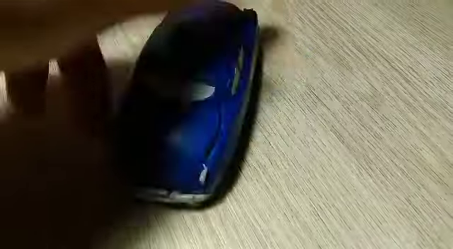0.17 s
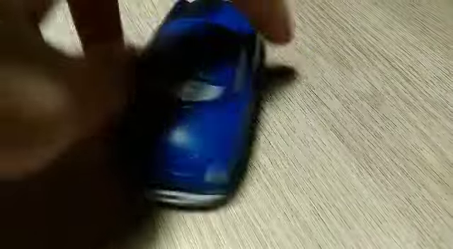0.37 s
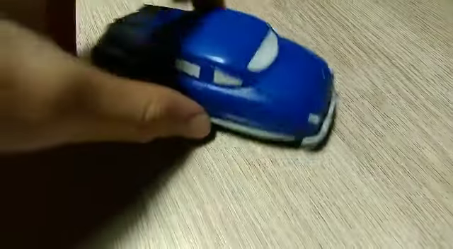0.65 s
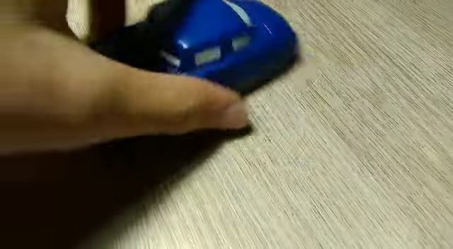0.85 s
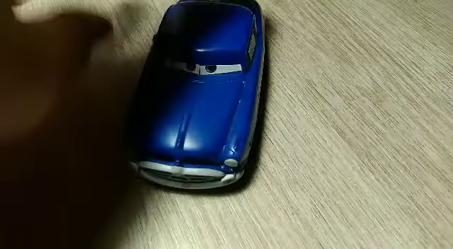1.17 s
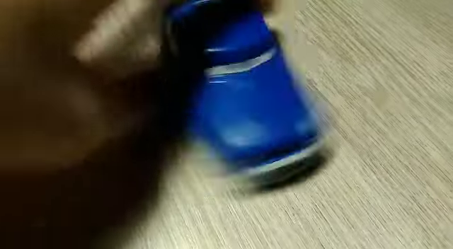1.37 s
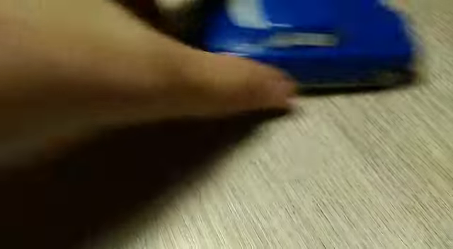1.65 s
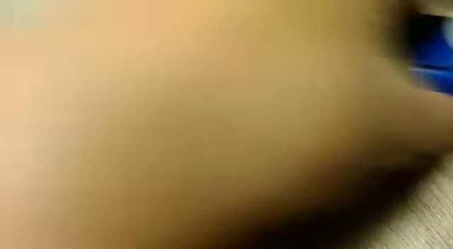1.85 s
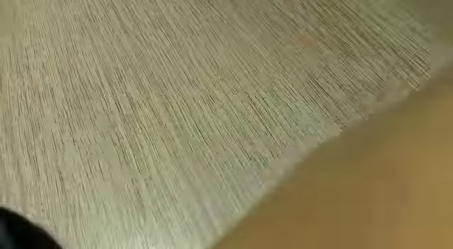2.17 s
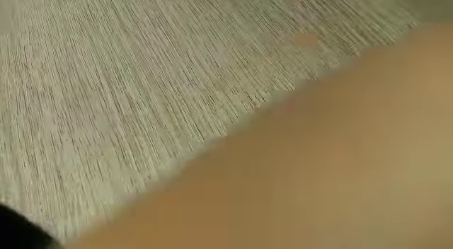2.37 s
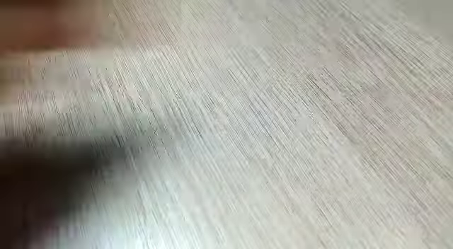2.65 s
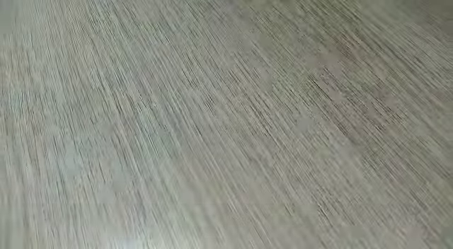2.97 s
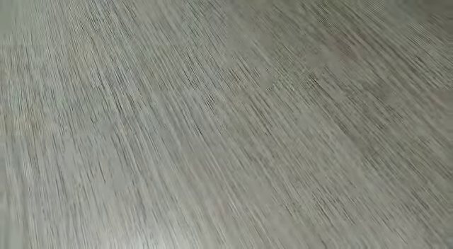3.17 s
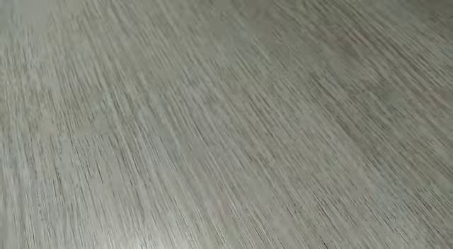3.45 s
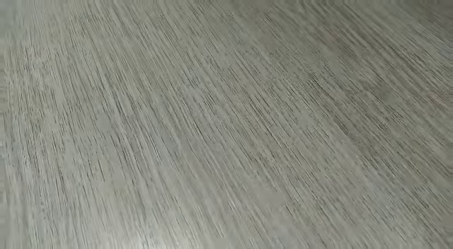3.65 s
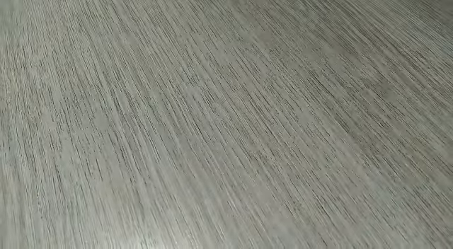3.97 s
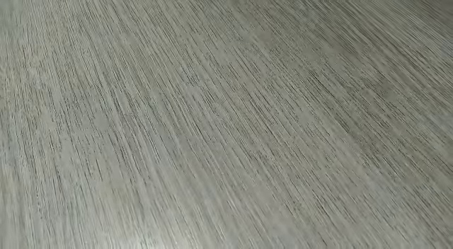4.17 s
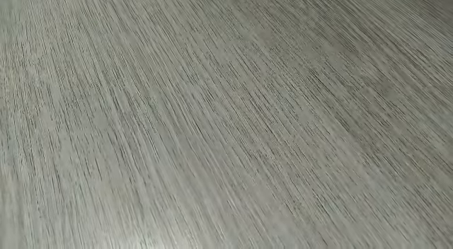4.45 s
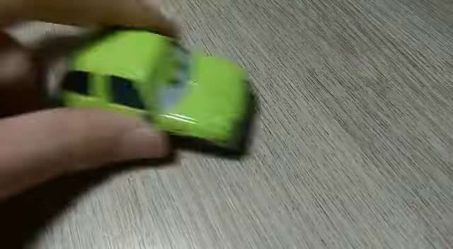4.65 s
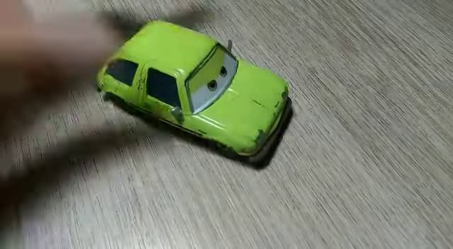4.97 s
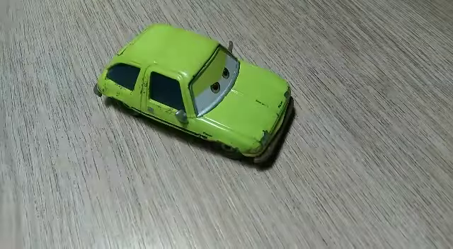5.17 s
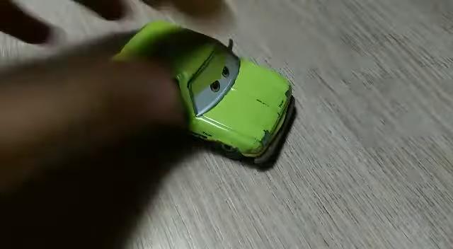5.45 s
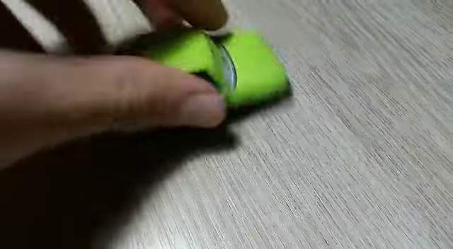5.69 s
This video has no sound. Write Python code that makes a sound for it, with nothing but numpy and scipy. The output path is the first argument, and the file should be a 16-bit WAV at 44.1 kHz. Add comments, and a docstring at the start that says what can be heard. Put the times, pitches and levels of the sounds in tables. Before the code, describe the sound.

Heard very close in a small, quiet, dry room: bursts of metallic wheel chatter and scraping on a hard tabletop, then a louder free run ending in bright clacks and low thumps. Skin slides dully over the surface. A quieter, grainy roll approaches in surges with loose axle clicks, stops with one crisp knock, pauses, then a brief scrapy push with a gritty skid.

```python
"""A laminate table in a small, quiet room: a hand steers a die-cast toy car to and fro, then lets it run off
and clack to a stop. A second car is rolled closer, set down and pushed on. Random small impacts stand for
the wheels chattering over the embossed grain; they ring the metal shells and make the tabletop drum.
Resonant bursts make knocks, clicks and bumps; filtered noise makes skin on laminate and the room's air."""
import sys
import numpy as np
from scipy import signal
from scipy.fft import rfft, irfft
from scipy.io import wavfile
from scipy.ndimage import uniform_filter1d, map_coordinates

SR = 44100
rng = np.random.default_rng(int(sys.argv[2]) if len(sys.argv) > 2 else 0)


def unload_audio(sound):
    """Save the sound as a 16-bit wav file, at the path given as the first command line argument."""
    columns = np.transpose(np.atleast_2d(sound))
    # keep every value between -1 and 1, then stretch to whole-number steps
    steps = np.round(np.clip(columns, -1, 1) * 32767)
    wavfile.write(sys.argv[1], SR, steps.astype(np.int16))


N = 256662
TIME = np.arange(N) / SR   # s
RELEASE_DB_PER_S = 268.5   # a stroke dies away at this rate when the hand stops
CRUISE_DB = -37.5   # shell rattle at an ordinary pace


def amp(db):
    """Decibels to gain."""
    return 10 ** (np.asarray(db) / 20)


def rms_one(x):
    """Scale to unit power."""
    return x / np.sqrt(np.mean(x ** 2) + 1e-20)


def steady(x, window_s):
    """Unit power over every short stretch, with the fine grain kept."""
    power = uniform_filter1d(x * x, round(window_s * SR), mode="reflect").clip(0)
    return x / np.sqrt(power + 1e-12)


def drift(rate):
    """Smooth chance of spread 1 that turns about rate times a second."""
    knots = rng.standard_normal(N // 40)
    return rms_one(np.interp(TIME * rate, np.arange(len(knots)), knots))


def colour(x, points):
    """Causal (minimum-phase) filter that follows a spectrum and falls away beyond its ends."""
    size = 8192
    hz, db = np.transpose(points)
    octave = np.log2(np.maximum(np.arange(size // 2 + 1) * SR / size, 1))
    beyond = np.abs(octave - np.clip(octave, np.log2(hz[0]), np.log2(hz[-1])))
    gain_db = np.interp(octave, np.log2(hz), db) - 20 * beyond
    # folding the cepstrum to positive times gives minimum phase
    cepstrum = irfft(np.log(amp(gain_db)))
    cepstrum[1:size // 2] *= 2
    cepstrum[size // 2 + 1:] = 0
    response = irfft(np.exp(rfft(cepstrum)))
    return signal.fftconvolve(x, response)[:len(x)]


def resonate(x, hz, width_hz):
    """A two-pole resonance with gain 1 on top; the narrower, the longer it rings."""
    r = np.exp(-np.pi * width_hz / SR)
    feed = np.array([1, 0, -1]) * (1 - r * r) / 2
    return signal.lfilter(feed, [1, -2 * r * np.cos(2 * np.pi * hz / SR), r * r], x)


def cut(x, hz, kind):
    """Steep low- or high-pass."""
    return signal.sosfilt(signal.butter(4, hz, kind, fs=SR, output="sos"), x)


def add(track, s, sound):
    """Mix a sound in at time s."""
    start = round(s * SR)
    track[start:start + len(sound)] += sound[:N - start]


def stroke(s, run_up_s, length_s, db, fade_db_per_s=RELEASE_DB_PER_S):
    """Gain of one movement: it gathers pace, holds, and dies away."""
    age = TIME - s
    run_up = np.clip(age / max(run_up_s, 1e-3), 0, 1)
    return run_up * amp(db - fade_db_per_s * np.maximum(age - length_s, 0))


def strokes(rows, fade_db_per_s=RELEASE_DB_PER_S):
    """Each movement takes over from the one before as that fades."""
    return np.max([stroke(*row, fade_db_per_s) for row in rows], axis=0)


# spectrum of the room's air: pitch_hz, level_db
AIR_COLOUR = [(15, -43.5), (25, -25.5), (59, -6.5), (112, -9), (130, -5), (393, -17), (462, -15),
              (834, -38), (1800, -55), (2340, -92), (3960, -120)]
# partials of a faint electronic whine: pitch_hz, level_db (before its swells)
WHINE_PARTIALS = [(3483, -106), (6950, -100), (10411, -93.5), (13900, -101.5)]
# swells of that whine: start_s, run_up_s, length_s, gain_db
WHINE_SWELLS = [(2.62, 0.046, 0.54, 4.5), (4.85, 0.035, 0.65, 11.5)]


def background(air_db, hiss_db):
    """Low room noise, a trace of hiss and a thin, wavering electronic whine that comes and goes."""
    whine = sum(amp(db + 3 * drift(39)) * np.sqrt(2) * np.sin(2 * np.pi * hz * TIME)
                for hz, db in WHINE_PARTIALS)
    air = amp(air_db) * rms_one(colour(rng.standard_normal(N), AIR_COLOUR))
    hiss = amp(hiss_db) * cut(rng.standard_normal(N), 7400, "low")
    return air + hiss + whine * strokes(WHINE_SWELLS)


def room(x, t60_s, wet_db, wall_hz):
    """Close walls return a short, slightly dull tail of decaying noise."""
    t = TIME[:SR // 2]
    tail = rng.standard_normal(len(t)) * amp(-60 * t / t60_s) * (t > .004)
    tail = signal.lfilter(*signal.butter(1, wall_hz, fs=SR), tail)
    return x + amp(wet_db) * signal.fftconvolve(x, tail / np.linalg.norm(tail))[:N]


# the arm slides over the table: start_s, run_up_s, length_s, level_db (relative)
ARM_SLIDES = [(2.5, 0.13, 0.097, -46.5), (2.61, 0.013, 0.04, -57), (2.66, 0.039, 0.48, -63)]
# the hand rubs it: start_s, run_up_s, length_s, level_db
PALM_RUBS = [(2.67, 0.04, 0.15, -67), (2.82, 0.03, 0.15, -62), (2.995, 0.012, 0.11, -57),
             (3.1, 0.02, 0.05, -47)]
# spectrum of the slide's rumble: pitch_hz, level_db
RUMBLE_COLOUR = [(24, -45), (40, 0.5), (97, 9), (140, 8), (208, 3), (308, -8), (400, -22), (520, -57),
                 (880, -120)]
# spectrum of skin rubbing: pitch_hz, level_db
RUB_COLOUR = [(150, -36), (250, -12.5), (400, -15), (530, -10.5), (650, -22.5), (1030, -28.5), (1370, -43),
              (1800, -48), (5000, -52), (7000, -45), (11000, -120)]


def arm(rumble_db, rub_db):
    """Skin slides dully over the laminate as uneven noise: the arm mostly rumbles, the hand only rubs."""
    slide = strokes(ARM_SLIDES)
    friction = rng.standard_normal(N) * amp(2.5 * drift(40))
    rub = amp(rub_db) * slide + strokes(PALM_RUBS)
    rumble = amp(rumble_db) * slide
    return rumble * rms_one(colour(friction, RUMBLE_COLOUR)) + rub * rms_one(colour(friction, RUB_COLOUR))


# bumps of hand and car on the tabletop: start_s, level_db (relative), pitch_hz, width_hz
TABLE_BUMPS = [(0.466, -25.5, 269, 202), (0.832, -28.5, 277, 200), (1.337, -27, 255, 296),
               (1.58, -25.5, 290, 685), (1.719, -21, 257, 100), (1.968, -24, 728, 506),
               (2.021, -21, 900, 604), (2.293, -24, 200.5, 400), (2.32, -19, 95, 90.5),
               (2.612, -18.5, 133, 68.5), (2.616, -23, 75.4, 49.7), (3.114, -28, 398, 250),
               (3.144, -30, 292, 200), (3.405, -24.5, 259, 245), (3.573, -23.5, 280, 148),
               (3.661, -30.5, 269, 120), (3.78, -27, 274, 120), (3.88, -25.5, 266, 120),
               (3.96, -25.5, 278, 120), (4.031, -29.5, 133, 80), (4.164, -28, 268, 100),
               (4.21, -27, 275, 100), (4.789, -19.5, 275, 110), (4.79, -26.5, 640, 400),
               (5.589, -28.5, 429, 247), (5.605, -28, 191, 150), (5.776, -21, 183, 120)]


def bumps(level_db, decay_s, scatter_db):
    """A blow sets one resonance of the tabletop booming briefly, and its neighbours with it."""
    out, t = np.zeros(N), TIME[:SR // 3]
    for s, db, hz, width_hz in TABLE_BUMPS:
        noise = resonate(rng.standard_normal(len(t)), hz, width_hz)
        neighbours = steady(cut(noise, 1000, "low"), .02)
        tone = np.sqrt(2) * np.sin(2 * np.pi * hz * t)
        boom = rms_one(tone + amp(scatter_db) * width_hz / hz * neighbours)
        envelope = (1 - np.exp(-2 * hz * t)) * np.exp(-t / decay_s)
        add(out, s, amp(db + level_db) * boom * envelope)
    return out


# drumming spectrum of the board: pitch_hz, level_db
BOARD_COLOUR = [(35, -46), (60, -5), (87, -2), (134, 3.5), (206, 1.5), (269, -2), (360, -11), (514, -7),
                (606, -9), (832, -10.5), (945, -9.5), (1250, -17.5), (1620, -46.5), (2750, -120)]
# resonances of the tabletop: pitch_hz, width_hz, level_db
BOARD_MODES = [(130, 50, -3), (270, 40, 0), (430, 80, -15), (522, 70, -11), (818, 90, -13)]


def tabletop(force):
    """The board drums evenly in a few broad resonances."""
    broad = rms_one(colour(force, BOARD_COLOUR))
    return steady(broad + amp(-3) * ring(force, BOARD_MODES, shift_db=1.5), .04)


def wheel_force(per_s, spread_db, judder_db, judder_rate):
    """Wheels hit ridges of the grain: tiny impacts of uneven size that judder in strength."""
    sizes = amp(spread_db * np.minimum(rng.exponential(1, N), 4)) * rng.choice([-1, 1], N)
    impacts = sizes * (rng.random(N) < per_s / SR)
    return impacts * amp(judder_db * drift(judder_rate)) + 1e-18


def stick_slip(per_s, slip_s, spread_db):
    """Gain of a wheel that catches and lets go at uneven intervals; unit power."""
    gaps, sizes = rng.standard_normal((2, N // 100))
    starts = np.append(0, np.cumsum(np.exp(.3 * gaps) / per_s))
    slip = np.searchsorted(starts, TIME, side="right") - 1
    age = (TIME - starts[slip]) / slip_s
    return rms_one(amp(spread_db * sizes[slip].clip(-1.5, 1.5)) * age * np.exp(-age))


def ring(force, modes, shift_db):
    """Resonances in parallel; grip and contact point keep shifting which of them speak."""
    rings = sum(resonate(force, hz, width) * amp(db + shift_db * drift(16).clip(-2, 2))
                for hz, width, db in modes)
    top_hz = 1.15 * max(hz for hz, width, db in modes)
    return rms_one(cut(cut(rings, top_hz, "low"), top_hz, "low"))


def regrip(x, per_s, detune):
    """Each change of finger pressure or contact point retunes the resonances a little."""
    grip = (TIME * per_s).astype(int)
    speed = detune * rng.standard_normal(N // 40)[grip]
    return map_coordinates(x, [np.arange(N) + np.cumsum(speed)], order=3, mode="mirror")


def body(force, spectrum, modes, ring_db):
    """A shell's broad response plus narrow resonances that hop about."""
    rings = regrip(ring(force, modes, shift_db=5.0), per_s=14, detune=.011)
    return rms_one(colour(force, spectrum)) + amp(ring_db) * rings


def roll(pace, force, spectrum, modes, ring_db, rumble_db, rumble_follows, grit_db, skid=0):
    """Pace drives the shell's rattle and grit, and more weakly the table's rumble; a skid adds grit."""
    shell = body(force, spectrum, modes, ring_db)
    rattle = steady(cut(shell, 3000, "low"), .05)
    grit = steady(cut(shell, 3000, "high"), .05)
    rumble = amp(rumble_db) * (pace / amp(CRUISE_DB)) ** rumble_follows
    return rumble * tabletop(force) + pace * rattle + (amp(grit_db) * pace + skid) * grit


def flurry(chatter_s):
    """Metal meets laminate in a run of rebounds that swells and dies within milliseconds."""
    age = TIME[:SR // 6] / chatter_s
    return rng.choice([-1, 1], len(age)) * (1 - np.exp(-3 * age)) * np.exp(-age ** 2)


def knock(force, spectrum, ring_hz, width_hz, ring_db):
    """The struck region of the shell stands out of its broad response."""
    broad = colour(force, spectrum)
    sound = rms_one(broad) + amp(ring_db) * rms_one(resonate(broad, ring_hz, width_hz))
    return amp(-25) * rms_one(sound)


# spectrum of an axle click: pitch_hz, level_db
CLICK_COLOUR = [(350, -80), (600, -13.5), (1360, -17), (2700, -21.5), (3080, -15), (4060, -5.5),
                (5710, -10.5), (6870, -4.5), (7240, -8.5), (9300, 0), (14000, -18)]


def tick(db, hz, chatter_s):
    """An axle clicks in its slot: a tiny flurry rings a broad resonance."""
    click = knock(flurry(chatter_s), CLICK_COLOUR, hz, width_hz=1400, ring_db=-3.0)
    return amp(db) * cut(click, 6800, "low")


# the loudest clicks of the green car's loose wheels: start_s, level_db (relative), pitch_hz
AXLE_CLICKS = [(3.1035, -27, 2500), (3.13, -23, 2000), (3.1405, -21, 4500), (3.5045, -30, 2550),
               (4.159, -13.5, 2500), (4.1845, -12, 6000), (4.2855, -21, 4320), (4.498, -14, 6300),
               (4.947, -31, 3800), (5.7606, -20, 4200), (5.7945, -16, 4100), (3.88, -23, 4000),
               (4.199, -18, 5500), (4.346, -22, 4000), (4.7397, -24, 4000), (4.7498, -20, 4200),
               (4.7565, -2, 4200), (5.608, -25.5, 3700), (5.674, -27, 4200)]


def ticks(level_db, chatter_s):
    """The green car's loose axles click, loudest as it is set down."""
    out = np.zeros(N)
    for s, db, hz in AXLE_CLICKS:
        add(out, s, tick(db + level_db, hz, chatter_s))
    return out


# the green car's roll closer comes in surges: start_s, run_up_s, length_s, level_db (shell rattle)
APPROACH_SURGES = [(3.499, 0.015, 0.32, -62), (3.528, 0.25, 0.42, -48), (3.866, 0.027, 0.14, -45.5),
                   (4.001, .01, 0.49, -52.5), (4.106, 0.047, 0.097, -43), (4.25, 0.1, 0.27, -46.5),
                   (4.557, 0.023, 0.032, -54.5), (4.637, .02, 0.051, -64.5)]


def stray_ticks(pace, chatter_s):
    """Small ticks come at uneven intervals on the long roll, as strong as the car is fast."""
    per_s, level_db, spread_db = 18, 17, 1   # level before the pace scales it
    out = np.zeros(N)
    times = np.arange(APPROACH_SURGES[0][0], APPROACH_SURGES[-1][0], 1 / per_s)
    for s, (late, strength, pitch) in zip(times, rng.random((len(times), 3))):
        s = s + late / per_s
        db = level_db + spread_db * (2 * strength - 1)
        add(out, s, pace[int(s * SR)] * tick(db, 2500 * 2 ** pitch, chatter_s))
    return out


def wobble():
    """Loose wheels knock against their axles in clusters; each knock rings another part of the shell."""
    force = wheel_force(per_s=260, spread_db=1.5, judder_db=3.0, judder_rate=35)
    pitches = np.geomspace(2080, 6480, 12)   # Hz
    dealt = rng.integers(0, len(pitches), N)
    rings = sum(resonate(resonate(force * (dealt == k), hz, 100), hz, hz / 2)
                for k, hz in enumerate(pitches))
    return amp(-2) * steady(rings, .15)


# swells of faint tones after the set-down: start_s, run_up_s, length_s, level_db
FAINT_TONES = [(4.82, 0.02, 0.04, -67), (4.91, 0.03, 0.07, -63)]
# resonances that make those tones: pitch_hz, width_hz, level_db
FAINT_TONE_MODES = [(1300, 55, -3), (2003, 40, -12), (2460, 80, -2), (2842, 40, -12), (4250, 300, -5)]


def faint_tones(force):
    """Faint, unsteady tones, mainly near 1300 and 2460 Hz, that fade after the set-down: narrow resonances."""
    tones = sum(amp(db) * steady(resonate(resonate(force, hz, width), hz, 8 * width), .06)
                for hz, width, db in FAINT_TONE_MODES)
    swells = sum(stroke(*row, fade_db_per_s=190) for row in FAINT_TONES)
    return swells * rms_one(tones)


def dull_when_slow(x, pace, top_hz, full_db):
    """Slow wheels meet the ridges gently, so the top of their sound only opens with pace."""
    low = cut(cut(x, top_hz, "low"), 2.37 * top_hz, "low")
    opening = np.minimum(pace / amp(full_db), 1) ** 2
    return low + opening * cut(x, top_hz, "high")


SKID_FADE_DB_PER_S = 552   # a skid ends quickly once the wheels grip
# the green car is handled: start_s, run_up_s, length_s, level_db (shell rattle)
GREEN_HANDLING = [(2.614, 0.008, 0.046, -68), (2.68, 0.026, 0.1, -79.5), (3.004, 0.004, 0.05, -83),
                  (3.1, 0.01, 0.063, -45), (3.235, 0.0094, 0.021, -54.5), (3.372, 0.035, 0.032, -50.5),
                  (3.42, 0.022, 0.16, -62), (4.748, 0.009, 0.0047, -40)]
# it settles after the set-down: start_s, run_up_s, length_s, level_db (shell rattle)
GREEN_SETTLING = [(4.79, 0.017, .06, -60), (4.88, 0.03, .08, -70)]
# it is pushed on: start_s, run_up_s, length_s, level_db (shell rattle)
GREEN_PUSHES = [(5.58, 0.031, 0.067, -59.5), (5.655, 0.0085, 0.29, -52)]
# one of its wheels groans as it slows: start_s, run_up_s, length_s, level_db
WHEEL_DRAG = [(4.425, 0.012, 0.055, -48.5)]
# its wheels skid sideways: start_s, run_up_s, length_s, level_db (grit)
GREEN_SIDE_SKIDS = [(3.865, 0.019, 0.075, -40.5), (5.72, 0.054, 0.047, -35.5), (5.785, 0.0094, 0.04, -31.5)]
# spectrum of its rolling: pitch_hz, level_db
GREEN_ROLL_COLOUR = [(450, -29.5), (800, -9.5), (1100, -2.5), (1400, -7), (2040, 0), (3000, -4), (3680, 1),
                     (4690, 7), (7470, 9.5), (9850, 4.5), (11500, 9), (14000, 1), (15500, -10)]
# spectrum of its push: pitch_hz, level_db
GREEN_PUSH_COLOUR = [(650, -43), (1100, -9), (1190, -8.5), (1470, -21), (2760, -11.5), (3000, -26),
                     (3290, -10), (4530, -8), (5350, -9.5), (9630, -23.5), (13000, -49)]
# resonances of its shell: pitch_hz, width_hz, level_db
GREEN_MODES = [(2190, 190, 1.5), (2520, 140, 9), (3270, 310, 6), (5170, 92, 14), (6290, 220, -35),
               (8000, 58, -19)]
# resonances of its shell under the fingers: pitch_hz, width_hz, level_db
GREEN_GRIPPED_MODES = [(4100, 200, 9), (4360, 26, -6), (4600, 22, 1), (4670, 24, -6), (5360, 49, 1)]


def green_car():
    """Its looser wheels give a drier, grainier roll, and one of them drags."""
    force = wheel_force(per_s=1500, spread_db=1.7, judder_db=2.2, judder_rate=90)
    groan = strokes(WHEEL_DRAG) * steady(resonate(resonate(force, 760, 301), 930, 260), 0.092)
    pace, handling = strokes(APPROACH_SURGES), strokes(GREEN_HANDLING)
    stutter = stick_slip(per_s=150, slip_s=.0009, spread_db=1.5)
    scrape = steady(resonate(resonate(force, 4530, 660), 3800, 920), 0.0053)
    skid = stutter * strokes(GREEN_SIDE_SKIDS, SKID_FADE_DB_PER_S) * scrape
    gripped = roll(handling, force, GREEN_ROLL_COLOUR, GREEN_MODES,
                   ring_db=-19.5, rumble_db=-48, rumble_follows=0.35, grit_db=-8.0)
    rolled = roll(pace, force, GREEN_ROLL_COLOUR, GREEN_MODES,
                  ring_db=-13.5, rumble_db=-43.5, rumble_follows=0.71, grit_db=-2.0)
    set_down = roll(strokes(GREEN_SETTLING), force, GREEN_ROLL_COLOUR, GREEN_MODES,
                    ring_db=-8.5, rumble_db=-42.5, rumble_follows=0.66, grit_db=4.0)
    nudged = roll(strokes(GREEN_PUSHES), force, GREEN_PUSH_COLOUR, GREEN_GRIPPED_MODES,
                  ring_db=-4.0, rumble_db=-46.0, rumble_follows=0.16, grit_db=1.0)
    moving = gripped + rolled + pace * wobble() + set_down
    moving = dull_when_slow(moving, pace + handling, top_hz=7720, full_db=-41.0)
    return groan + moving + faint_tones(force) + nudged + skid + stray_ticks(pace, chatter_s=0.0103)


# the blue car knocks on the table: start_s, level_db (relative), pitch_hz, chatter_s (span of the rebounds)
BLUE_CLACKS = [(0.032, -14, 4300, 0.0065), (0.365, -36.5, 4400, 0.0046), (0.4085, -28.5, 2500, 0.0052),
               (0.4679, -20, 4280, .005), (0.5424, -19.5, 4100, 0.0029), (0.8167, -28, 4100, 0.0062),
               (0.991, -24.5, 4200, .007), (1.021, -26.5, 3300, .007), (1.345, -35.5, 2400, .004),
               (1.514, -20, 3800, .007), (1.634, -30, 3800, .004), (1.711, -22, 4000, .007),
               (1.734, -22, 2400, 0.0053), (2.006, -18.5, 4100, .007), (2.0205, -5, 4600, 0.0066),
               (2.025, -6.5, 2300, .008), (2.033, -9.5, 1750, 0.0081), (2.1018, -12, 3500, .0055),
               (2.2915, -2, 3400, 0.0055), (2.3183, -7, 3400, .005), (2.3242, -9.5, 2950, 0.0072),
               (2.3344, -15, 2900, .007), (2.348, -19.5, 2900, 0.005), (2.374, -24.5, 4320, .007),
               (2.438, -34.5, 3000, .007)]
# spectrum of a clack: pitch_hz, level_db
KNOCK_COLOUR = [(53, -52), (90, -17), (1140, -18.5), (1300, -16.5), (1580, -24.5), (1760, -8.5),
                (1920, -7.5), (2710, -6.5), (2950, -2.5), (3150, -18.5), (3430, 3), (3900, -7.5),
                (5880, -12), (7780, -15.5), (15500, -37.5)]
# resonances of the blue shell under the fingers: pitch_hz, width_hz, level_db
BLUE_GRIPPED_MODES = [(1148, 90, -19), (1292, 130, -21), (1830, 30, -5.5), (1972, 50, 2), (2318, 100, -0.5),
                      (2570, 130, -2.5), (2924, 100, -4.5), (3315, 140, -5), (3982, 200, 3), (4450, 58, -7),
                      (4960, 230, -3)]


def clacks(level_db, after_ring_db, soft_hz):
    """The blue car knocks on the table and its shell rings on; gentle touches are duller."""
    out = np.zeros(N)
    for s, db, hz, chatter_s in BLUE_CLACKS:
        hit = knock(flurry(chatter_s), KNOCK_COLOUR, hz, width_hz=450, ring_db=0.0)
        add(out, s, amp(db + level_db) * cut(hit, soft_hz * amp(0.39 * db), "low"))
    shell = ring(out, BLUE_GRIPPED_MODES, shift_db=4.0)
    return out + amp(after_ring_db) * np.std(out) * shell


# a wheel binds on one resonance of the blue shell: start_s, run_up_s, length_s, level_db, pitch_hz
WHEEL_SQUEAKS = [(0.032, 0.0038, 0.036, -45, 1910), (0.036, 0.005, 0.054, -35, 2320),
                 (0.028, 0.0033, 0.029, -36.5, 6900), (0.162, 0.0079, 0.021, -31, 4120),
                 (0.471, 0.0065, 0.055, -40, 1970), (0.817, 0.0034, 0.0044, -36.5, 4190),
                 (0.931, 0.037, 0.067, -43.5, 1887), (1.015, .005, 0.024, -37, 3296),
                 (1.019, .005, 0.013, -33, 5030), (1.568, 0.026, 0.051, -43.5, 2322)]


def squeaks(force):
    """A binding wheel feeds a single resonance for a moment."""
    width_hz, fade_db_per_s = 63, 704
    return sum(stroke(*row, fade_db_per_s)
               * steady(resonate(resonate(force, hz, width_hz), hz, width_hz), 0.0089)
               for *row, hz in WHEEL_SQUEAKS)


# the blue car is steered: start_s, run_up_s, length_s, level_db (shell rattle)
BLUE_STEERING = [(0.0, 0.0009, 0.0036, -35.5), (0.03, 0.0087, 0.093, -37.5), (0.1, 0.0095, 0.079, -38.5),
                 (0.366, 0.0028, 0.044, -54), (0.43, 0.014, 0.04, -51.5), (0.466, 0.004, 0.15, -41),
                 (0.645, 0.013, 0.073, -46.5), (0.78, 0.0042, 0.063, -51), (0.85, 0.039, 0.12, -53),
                 (0.935, 0.068, 0.11, -40), (1.1, 0.016, 0.051, -64.5)]
# it is driven straight: start_s, run_up_s, length_s, level_db (shell rattle)
BLUE_DRIVING = [(1.338, 0.015, 0.036, -50), (1.37, 0.075, 0.2, -39), (1.635, 0.0059, 0.21, -41),
                (1.71, 0.0013, 0.33, -37)]
# it runs free: start_s, run_up_s, length_s, level_db (shell rattle)
BLUE_COASTING = [(2.018, 0.003, 0.06, -30.5), (2.1, .012, 0.04, -32), (2.12, .02, 0.24, -36),
                 (2.19, 0.02, 0.09, -34), (2.24, 0.035, .045, -30), (2.33, 0.01, 0.025, -33)]
# its wheels skid sideways in turns and under a hard push: start_s, run_up_s, length_s, level_db (grit)
BLUE_SIDE_SKIDS = [(0.032, 0.0018, 0.037, -32.5), (0.166, 0.0098, 0.021, -51), (0.54, 0.0022, 0.073, -40.5),
                   (0.815, 0.0037, 0.008, -49.5), (0.985, 0.035, 0.039, -36.5), (1.43, 0.033, 0.16, -40),
                   (1.705, 0.0047, 0.026, -36), (2.035, 0.0042, 0.055, -35.5)]
# spectrum of the steered roll: pitch_hz, level_db
STEERED_COLOUR = [(500, -39.5), (800, -27), (1150, -23), (1430, -17.5), (1890, -11.5), (2150, -7),
                  (2330, -19.5), (3080, -13), (4160, 1), (5080, -5), (5840, -16.5), (7060, -6), (7650, -14),
                  (10200, -22), (12000, -30), (15600, -87), (22000, -120)]
# spectrum of the straight drive: pitch_hz, level_db
DRIVEN_COLOUR = [(650, -56), (1100, -17), (1150, -24), (1580, -11), (2090, -10), (2490, -2.5),
                 (3090, -13.5), (3500, -12), (5080, 0.5), (5930, -24), (7070, -2.5), (9150, -24),
                 (10300, -12), (12600, -29.5), (13000, -48)]
# spectrum of the free run: pitch_hz, level_db
FREE_COLOUR = [(400, -35), (650, -13), (1100, -13), (1300, -9), (1550, 2.5), (2130, 7.5), (2600, -5),
               (3050, -8), (3500, -5), (3900, -9.5), (4300, -6), (5750, -15), (8690, -20), (13000, -34)]
# resonances of the shell driven straight: pitch_hz, width_hz, level_db
BLUE_ROLLING_MODES = [(2134, 35, -1.5), (2520, 140, -2), (2900, 32, -9), (3570, 240, -14.5),
                      (4020, 320, -5.5), (5030, 190, -6.5), (6400, 160, -9), (7860, 67, -24)]
# resonances of the shell running free: pitch_hz, width_hz, level_db
BLUE_FREE_MODES = [(1490, 70, -7), (1688, 32, -2), (1700, 90, -5.5), (1840, 51, 0.5), (2140, 60, -5),
                   (2330, 90, -7.5), (2850, 190, -16), (4320, 120, -18)]


def blue_car():
    """Steered under the fingers, driven straight, then let go; plastic wheels give little top."""
    ridges = wheel_force(per_s=2000, spread_db=2.5, judder_db=2.0, judder_rate=150)
    hops = wheel_force(per_s=50, spread_db=1.5, judder_db=1.0, judder_rate=20)   # axles hop and land
    force = ridges + amp(10) * hops
    stutter = stick_slip(per_s=170, slip_s=.0022, spread_db=2.5)
    skid = stutter * strokes(BLUE_SIDE_SKIDS, SKID_FADE_DB_PER_S)
    steered = roll(strokes(BLUE_STEERING), force, STEERED_COLOUR, BLUE_GRIPPED_MODES,
                   ring_db=1.5, rumble_db=-55.0, rumble_follows=0.25, grit_db=-1.0, skid=skid)
    driven = roll(strokes(BLUE_DRIVING), force, DRIVEN_COLOUR, BLUE_ROLLING_MODES,
                  ring_db=0.5, rumble_db=-50.0, rumble_follows=0.73, grit_db=-7.0)
    free = roll(strokes(BLUE_COASTING), force, FREE_COLOUR, BLUE_FREE_MODES,
                ring_db=1.5, rumble_db=-53.0, rumble_follows=0.5, grit_db=-6.5)
    car = steered + driven + free + squeaks(force)
    return cut(cut(car, 10500, "low"), 11000, "low")


def scene():
    """Both cars and the hand on the table, heard from close by."""
    clacking = clacks(level_db=0.5, after_ring_db=-11.5, soft_hz=14900)
    clicking = ticks(level_db=-8.5, chatter_s=0.0038)
    hand = bumps(level_db=-17.0, decay_s=0.029, scatter_db=-0.5) + arm(rumble_db=2.5, rub_db=-15.0)
    dry_table = blue_car() + green_car() + clacking + clicking + hand
    table = room(dry_table, t60_s=0.078, wet_db=-12.0, wall_hz=7300)
    return (table + background(air_db=-62.0, hiss_db=-88.0))[None]


def record(dry):
    """The top is cut steeply, 70 dB down from 16.3 kHz."""
    return signal.sosfilt(signal.cheby2(16, 70, 16300, fs=SR, output="sos"), dry)


dry = scene()
out = record(dry)
unload_audio(out)
```